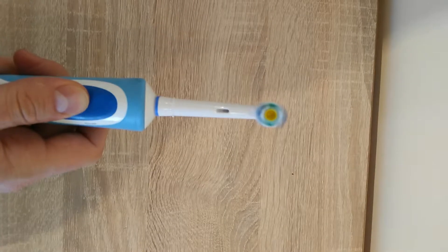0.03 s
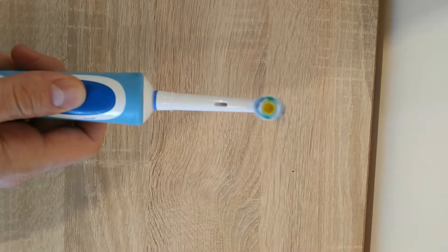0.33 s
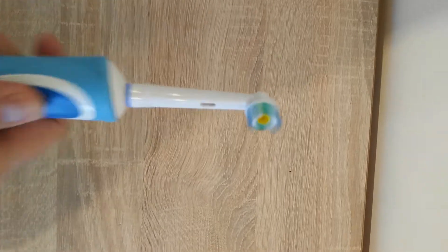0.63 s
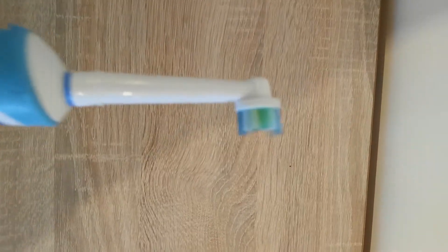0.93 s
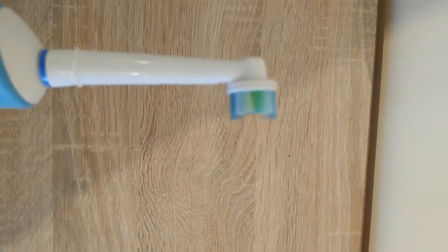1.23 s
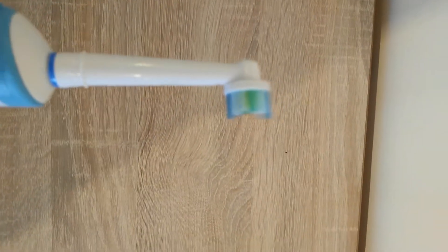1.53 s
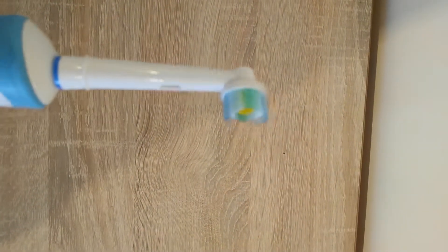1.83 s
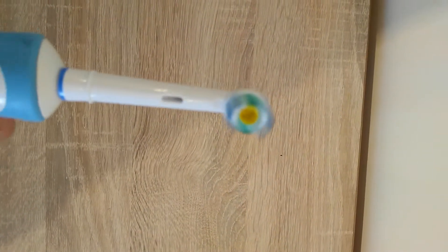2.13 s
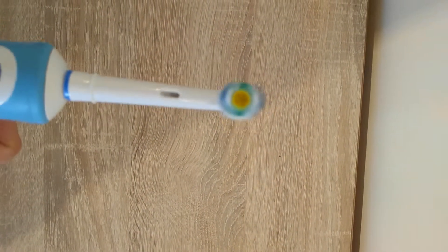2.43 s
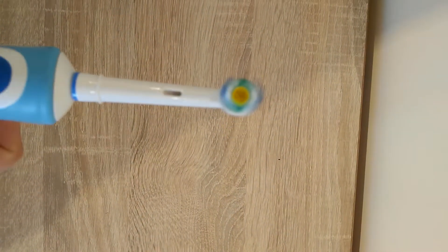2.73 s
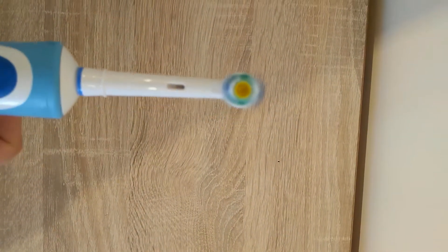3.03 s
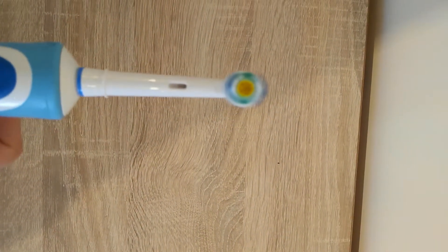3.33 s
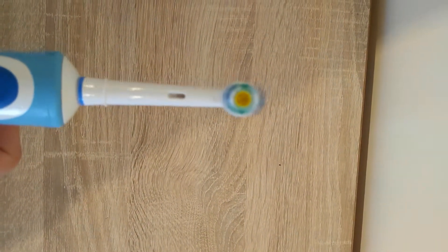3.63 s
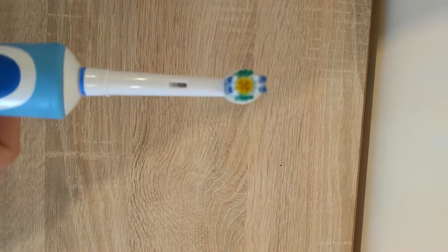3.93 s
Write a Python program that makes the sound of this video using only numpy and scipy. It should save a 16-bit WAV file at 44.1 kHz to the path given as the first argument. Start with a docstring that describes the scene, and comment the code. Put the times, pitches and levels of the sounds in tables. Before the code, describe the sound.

An electric toothbrush buzzes steadily, grows louder as it comes close, then switches off.

```python
"""Electric toothbrush at the microphone

A small room, one microphone. The brush runs in the air over a table, is brought in close, turned from
side-on to bristles-first, and switched off to coast to rest. Its gear swings the head to and fro; the
drive knocks and scrapes at the same places in every swing and rings the plastic body, over the hum of
the handle and the whine of the gear."""
import sys
import numpy as np
from scipy import signal
from scipy.fft import rfft, irfft
from scipy.io import wavfile
from scipy.ndimage import uniform_filter1d, map_coordinates

SR = 44100
rng = np.random.default_rng(int(sys.argv[2]) if len(sys.argv) > 2 else 0)


def waveform_to_disk(signal):
    """Save audio, clipped to [-1, 1], as 16-bit WAV at the path in sys.argv[1]."""
    frames = np.transpose(np.atleast_2d(signal))
    scaled = np.clip(frames, -1, 1) * 32767
    samples = np.round(scaled).astype(np.int16)
    wavfile.write(sys.argv[1], SR, samples)


N = 176400

# room tone spectrum: frequency_hz, gain_db
ROOM_TONE = [(25, 0), (60, 0), (130, -1), (400, -3), (800, -19), (3000, -30), (15000, -37)]
# speed of the drive: time_s, swing_hz
SWING_RATE = [(0, 58), (.1, 63.76), (.22, 64.44), (1, 64.71), (1.5, 64.35), (2.1, 64.52), (2.6, 64.75),
              (3.2, 64.73), (3.5, 64.97), (3.738, 64.74), (3.75, 57.5), (3.775, 50), (3.8, 38),
              (3.86, 23.5), (3.92, 10), (3.95, 0)]
# rattle at full speed as the brush is moved: time_s, low_db, middle_db, treble_db
RATTLE_LEVELS = [(0.0, -47, -38, -29), (0.03, -32, -24.5, -26), (0.04, -30.5, -32, -23),
                 (0.06, -27.5, -23.5, -19.5), (0.12, -27.5, -23, -17.5), (0.63, -28.5, -22.5, -18),
                 (0.78, -28, -18, -15.5), (1.0, -23.5, -16.5, -15), (1.7, -24, -16.5, -15.5),
                 (1.96, -26, -16, -15.5), (2.11, -24.5, -18, -15.5), (2.7, -25.5, -22, -18),
                 (2.98, -26.5, -20.5, -18.5), (3.7, -26, -22.5, -19)]
# contacts in one swing, against the steady sliding:
# place_swings, rise_ms, low_db, middle_db, treble_db, far_change_db, speed_exponent
CONTACTS = [(.93, 0.4, 9.5, 12, 16, -8, 4.3), (1, 1, 2.5, -2.5, 6.5, -0.5, 4),
            (0.24, 1, -3, 5, 13, -2, 1.2), (0.42, 0.54, 5.5, 8, 15.5, -1, 0.21),
            (0.53, 0.92, 10.5, 9.5, 7.5, -5, 0.13)]
# low, middle and treble rattle: share_repeating_each_swing, share_repeating_with_teeth, trim_db
REGISTERS = [(0.48, 0.29, -0.15), (0.4, 0.24, -3), (0.24, 0.31, -0.25)]
# borders of those registers: frequency_hz
REGISTER_EDGES = [190, 3400, 6300, 20000]
# colour of the contact force: frequency_hz, gain_db
FORCE_COLOUR = [(250, 8), (400, -1), (520, -6.5), (700, -3), (1000, -1.5), (1500, 0.5), (1750, 3),
                (2100, 1.5), (2500, 0.5), (3100, -1.5), (3700, -1), (4300, -0.5), (5200, -2), (6500, 0),
                (8000, -1.5), (10000, -0.5), (15000, 0.5)]
# plastic body from afar, close side-on, and bristles to the microphone: frequency_hz, gain_db
BODY_FAR = [(350, -56.5), (600, -19), (634, -11), (902, -16.5), (993, -11), (1110, -16), (1320, -13.5),
            (1780, -13), (1930, -9), (2340, -11), (3330, -9.5), (3660, -6.5), (4310, -6), (5010, -1.5),
            (5360, -6.5), (5660, -14.5), (7040, -7), (7960, -4), (8750, -5.5), (9630, -5.5), (12500, -12),
            (13300, -15.5), (15500, -18)]
BODY_SIDE = [(310, -53), (520, -12), (543, -20.5), (591, -15.5), (671, -15), (752, -17), (931, -22.5),
             (1220, -22.5), (1310, -21.5), (1430, -27), (1740, -18.5), (2150, -17.5), (2450, -15.5),
             (2740, -7.5), (3390, -10), (4320, -6.5), (5900, -14.5), (7510, -5), (8300, -2), (9560, -8.5),
             (10400, -6.5), (11000, -16.5), (12700, -12), (13800, -22), (15500, -15.5)]
BODY_FACE = [(350, -45.5), (600, -11.5), (634, -4), (855, -11), (890, -10), (993, -17.5), (1090, -15.5),
             (1200, -10), (1490, -24.5), (1760, -11.5), (1910, -7.5), (2470, -7), (2870, -0.5),
             (3290, -5.5), (3710, -3.5), (4430, -1), (5290, -5.5), (6310, -3.5), (7330, -7), (7960, -4.5),
             (9630, -1.5), (11200, -11), (12600, -7.5), (13700, -17), (15500, -16.5)]
# hum harmonics in the same three poses: swing_multiple, gain_db
HUM_FAR = [(1, -21), (2, 2.5), (3, -11), (4, -5), (5, -6.5), (6, -22), (7, -17.5), (8, -16), (9, -15),
           (10, -7), (11, -6.5), (12, -13), (13, -13), (14, -20), (15, -5), (16, -6.5)]
HUM_SIDE = [(1, -24), (2, 1), (3, -12), (4, -16), (5, -9.5), (6, -9.5), (7, -17.5), (8, -18.5), (9, -4),
            (10, -13), (11, -21.5), (12, -1), (13, -8), (14, -0.5), (15, -8), (16, -11.5)]
HUM_FACE = [(1, -23.5), (2, 0.5), (3, -10.5), (4, -11), (5, -21.5), (6, -17.5), (7, -24), (8, -16),
            (9, -10.5), (10, -6.5), (11, -8.5), (12, 1), (13, -11.5), (14, -10), (15, -12), (16, -14)]
# hum as grip and distance change: time_s, gain_db
HUM_GAIN = [(0.0, -46), (0.07, -45), (0.11, -54), (0.18, -44), (0.49, -42), (0.52, -48), (0.57, -42),
            (1.93, -42), (2.0, -44), (2.29, -38), (3.72, -42)]
# motor and gear tones: swing_multiple
WHINE_ORDERS = [2.6, 7.8, 15.6, 28, 32, 43, 65, 80, 130]
# each of those tones at full speed: far_db, side_db, facing_db
WHINE_LEVELS = [(-60, -51, -50.5), (-58.5, -52, -57.5), (-49, -51, -44.5), (-50, -38.5, -35.5),
                (-58, -44, -48), (-42.5, -41, -33), (-43, -35, -58), (-33, -58, -53), (-36, -37, -29)]
# reversals of the head: place_swings, gain_db
REVERSALS = [(.935, -1.5), (.47, -1)]
# neck ring as grip and direction change, against the middle rattle: time_s, pitch_hz, gain_db
NECK_RING = [(.62, 4980, -5.5), (.7, 4300, -1.5), (.95, 4020, -1.9), (1.9, 4010, -2.5), (2.3, 4280, -4.5),
             (2.7, 4300, -8.5), (3.05, 4260, -5), (3.7, 4250, -3.5)]
# drive shaft ring, against the treble rattle: time_s, gain_db
SHAFT_GAIN = [(.65, -22), (.8, -10), (1.7, -13), (2.1, -3), (2.35, -10), (2.7, -22), (3.05, -7), (3.7, -3)]
# the switch pressed on, and later the drive settling at the stop: start_s, rise_s, level_db
CLACKS = [(.021, 0.00086, -19.5), (0.057, 0.0019, -18.5), (3.915, 0.0034, -37), (3.9245, 0.0005, -47),
          (3.98, .001, -53)]

FULL_SPEED_HZ = 64.7
RING_JITTER_S = .00002


def undb(db):
    """Decibels to amplitude."""
    return 10 ** (np.asarray(db) / 20)


def unit(x):
    """Scale to rms 1."""
    return x / np.sqrt(np.mean(x ** 2) + 1e-18)


def curve(rows, column=1):
    """One column of a table, joined by straight lines in time."""
    rows = np.array(rows)
    return np.interp(np.arange(N) / SR, rows[:, 0], rows[:, column])


def drift(rate_hz):
    """Slow random wander of rms 1."""
    hold = int(SR / rate_hz)
    steps = np.repeat(rng.standard_normal(N // hold + 1), hold)
    return unit(uniform_filter1d(steps, hold)[:N])


def response(points):
    """Causal frequency response through (frequency_hz, gain_db) points."""
    hz, db = np.array(points).T
    f = np.maximum(np.fft.rfftfreq(N, 1 / SR), 1)
    cepstrum = irfft(np.log(undb(np.interp(np.log(f), np.log(hz), db))))
    cepstrum[1:N // 2] *= 2
    cepstrum[N // 2 + 1:] = 0
    return np.exp(rfft(cepstrum))


def noise(colour):
    """Coloured noise of rms 1."""
    return unit(irfft(rfft(rng.standard_normal(N)) * response(colour)))


def room_tone(level_db=-56.5):
    """A faint, steady low rumble behind the brush."""
    return noise(ROOM_TONE) * undb(level_db)


def knocks(swings, place, jitter_s, scatter_db=.76, beat_db=1.45, beat_s=.00007):
    """An impulse at one place in every swing; the turning motor shaft shifts its strength and time."""
    passes = np.arange(np.ceil(swings[0] - place), swings[-1] - place) + place
    chance = rng.standard_normal((N // 500, 2))[:len(passes)]
    beat = np.sin(2 * np.pi * 2.6 * passes)  # 2.6 motor turns a swing
    times = np.interp(passes, swings, np.arange(N) / SR) + beat_s * beat + jitter_s * chance[:, 0]
    at = np.clip(times * SR, 0, N - 1).astype(int)
    return np.bincount(at, undb(beat_db * beat + scatter_db * chance[:, 1]), N)


def swell(rise_s):
    """Envelope of one contact: it peaks at 1 after rise_s and dies away."""
    age = np.arange(SR // 50) / SR / rise_s
    return age * np.exp(1 - age)


def roughness(swings, period):
    """Surface of the sliding parts, which comes round again every period swings."""
    size = int(SR / FULL_SPEED_HZ) * period
    bumps = irfft(np.exp(2j * np.pi * rng.random(size // 2 + 1)), size)
    return unit(map_coordinates(bumps, [swings / period % 1 * size], order=3, mode="grid-wrap"))


def drive_rattle(swings, speed, poses):
    """The drive slides and knocks; the body colours it by distance and angle to the microphone."""
    bodies = [response(body) for body in (BODY_FAR, BODY_SIDE, BODY_FACE)]
    colour = response(FORCE_COLOUR)
    presses = []
    for place, rise_ms, *register_db, far_db, exponent in CONTACTS:
        press = signal.fftconvolve(knocks(swings, place, jitter_s=.00005), swell(rise_ms / 1000))[:N]
        presses.append((register_db, press * undb(far_db * poses[0]) * speed ** exponent))
    f = np.fft.rfftfreq(N, 1 / SR)
    below = [1 / (1 + (f / edge_hz) ** 24) for edge_hz in REGISTER_EDGES]
    out = 0
    for k, (swing_share, teeth_share, trim_db) in enumerate(REGISTERS):
        swing_share = swing_share * speed ** 2
        teeth_share = min(teeth_share, .3) * speed ** 2
        grain = (np.sqrt(swing_share) * roughness(swings, period=1)
                 + np.sqrt(teeth_share) * roughness(swings, period=5)
                 + np.sqrt(1 - swing_share - teeth_share) * rng.standard_normal(N))
        force = np.sqrt(speed + sum((undb(db[k]) * press) ** 2 for db, press in presses))
        band = np.sqrt(below[k + 1] - below[k] + 1e-12)
        scrape = rfft(np.tanh(grain) * force) * band * colour
        sound = sum(pose * unit(irfft(scrape * body)) for pose, body in zip(poses, bodies))
        out += sound * undb(curve(RATTLE_LEVELS, column=k + 1) + trim_db)
    return out


def handle_hum(swings, poses, trim_db=-.4):
    """The handle shakes at the swing rate and its multiples, strongly at the second."""
    out = 0
    for (order, far_db), (_, side_db), (_, face_db) in zip(HUM_FAR, HUM_SIDE, HUM_FACE):
        gain = undb([far_db, side_db, face_db]) @ poses
        out += gain * np.sin(2 * np.pi * (order * swings + rng.random()))
    return np.sqrt(2) * out * undb(curve(HUM_GAIN) + trim_db)


def gear_whine(swings, poses, flutter_db=2):
    """Fluttering tones of the motor shaft and the gear teeth."""
    out = 0
    for order, pose_db in zip(WHINE_ORDERS, WHINE_LEVELS):
        gain = undb(np.array(pose_db) @ poses + flutter_db * drift(rate_hz=25.18))
        out += gain * np.sin(2 * np.pi * (order * swings + rng.random()))
    return np.sqrt(2) * out


def neck_ring(swings, sweep_hz=2800, sweep_s=.0009):
    """Each reversal bends the neck; high bending waves arrive first, so the ring falls in pitch."""
    envelope = swell(rise_s=.0013)
    extra_hz = sweep_hz * np.exp(-np.arange(len(envelope)) / SR / sweep_s)
    chirp = envelope * np.exp(2j * np.pi * np.cumsum(extra_hz) / SR)
    carrier = np.exp(2j * np.pi * np.cumsum(curve(NECK_RING)) / SR)
    kicks = sum(undb(db) * knocks(swings, place, RING_JITTER_S) for place, db in REVERSALS)
    ring = carrier * signal.fftconvolve(kicks / carrier, chirp)[:N]  # chirps ride the moving pitch
    return unit(ring.imag) * undb(curve(RATTLE_LEVELS, column=2) + curve(NECK_RING, column=2))


def shaft_ping(swings, pitch_hz=7965, place=.925):
    """The sharpest knock of each swing rings the drive shaft, short and bright."""
    envelope = swell(rise_s=.00036)
    ping = envelope * np.sin(2 * np.pi * pitch_hz * np.arange(len(envelope)) / SR)
    ring = signal.fftconvolve(knocks(swings, place, RING_JITTER_S), ping)[:N]
    return unit(ring) * undb(curve(RATTLE_LEVELS, column=3) + curve(SHAFT_GAIN))


def switch_and_stop_clacks():
    """The switch clicks at the start and loose parts knock at the stop: bursts of noise in the colour of the
    body."""
    force = np.zeros(N)
    for start_s, rise_s, level_db in CLACKS:
        start = int(start_s * SR)
        envelope = swell(rise_s)[:N - start]
        force[start:start + len(envelope)] += undb(level_db) * envelope
    return force * noise(BODY_FACE)


def room_echo(x, t60_s=.31, gain_db=-13.5, gap_s=.0019):
    """Short diffuse echo reaching the microphone from the table and the walls."""
    t = np.arange(SR // 2) / SR
    tail = rng.standard_normal(len(t)) * np.exp(-np.log(1000) * t / t60_s) * (t > gap_s)
    return undb(gain_db) * signal.fftconvolve(x, tail / np.linalg.norm(tail))[:N]


def scene(approach_s=(.53, .88), turn_s=(1.96, 2.56)):
    """The drive sets the rhythm; the hand sets distance and angle to the microphone."""
    t = np.arange(N) / SR
    swing_hz = curve(SWING_RATE)
    speed = np.clip(swing_hz / FULL_SPEED_HZ, 1e-6, 1)
    swings = .34 + np.cumsum(swing_hz) / SR  # starts part-way through a swing
    wobbly_swings = swings + .00062 * drift(rate_hz=30)
    near = np.interp(t, approach_s, (0, 1))
    facing = np.interp(t, turn_s, (0, 1))
    poses = np.array([1 - near, near * (1 - facing), near * facing])  # far, side-on, facing
    effort = speed ** 1.2  # the sound fades as the motor coasts
    clatter = drive_rattle(swings, speed, poses) + neck_ring(swings) * speed
    clatter += shaft_ping(swings) * speed ** 5
    clatter = clatter * effort + switch_and_stop_clacks()
    hum = handle_hum(wobbly_swings, poses) * speed ** 2
    whine = gear_whine(wobbly_swings, poses) * speed ** 6
    return (room_tone() + clatter + room_echo(clatter) + (hum + whine) * effort)[None]


def record(dry):
    """The recorder clips anything over full scale and cuts the top treble steeply."""
    lowpass = signal.ellip(12, .1, 80, 15850, fs=SR, output="sos")
    return signal.sosfilt(lowpass, np.clip(dry, -1, 1))


dry = scene()
out = record(dry)
waveform_to_disk(out)
```